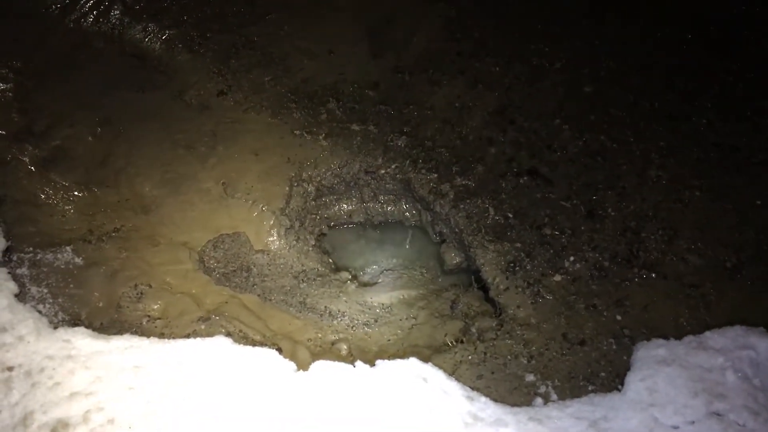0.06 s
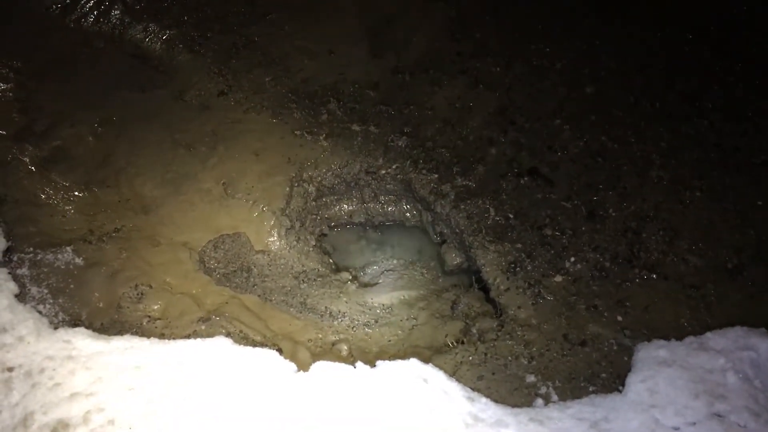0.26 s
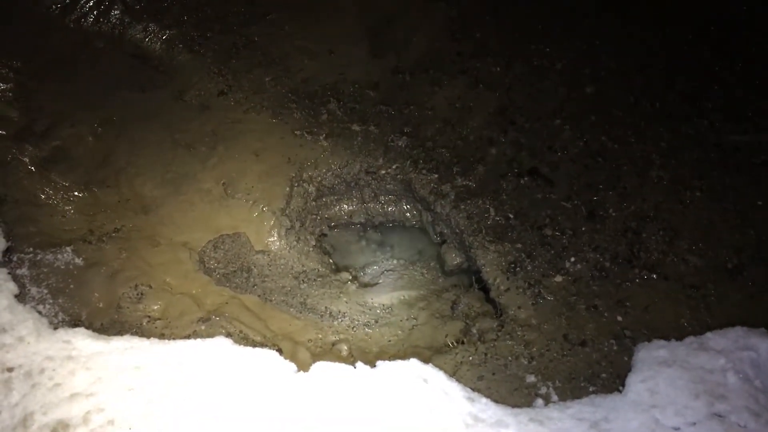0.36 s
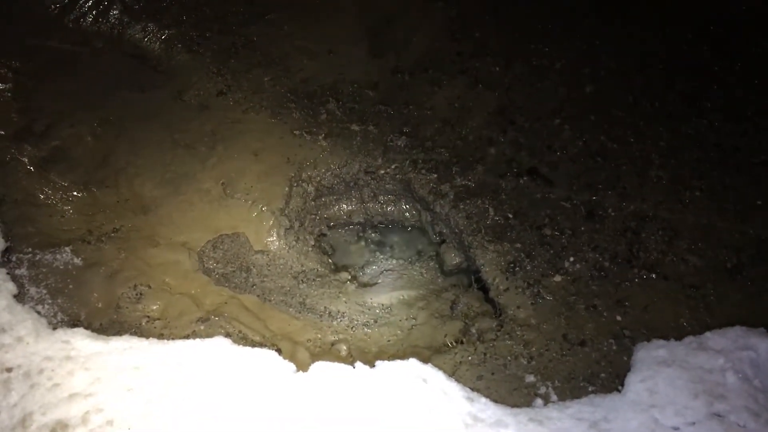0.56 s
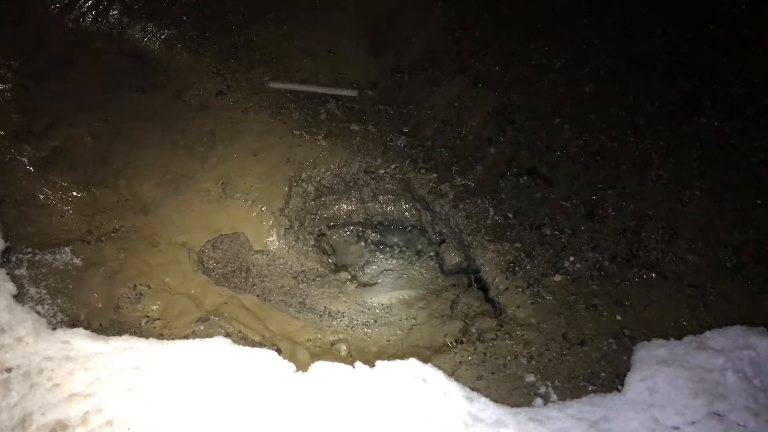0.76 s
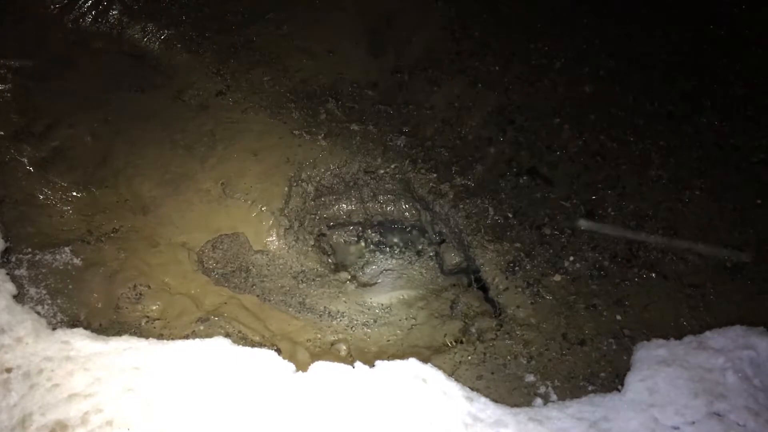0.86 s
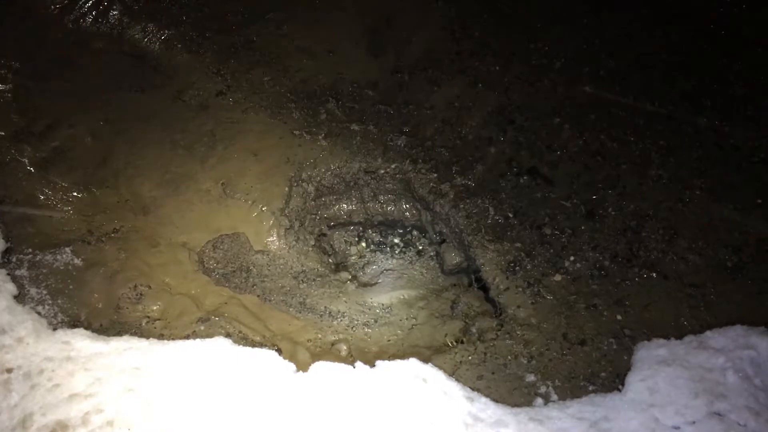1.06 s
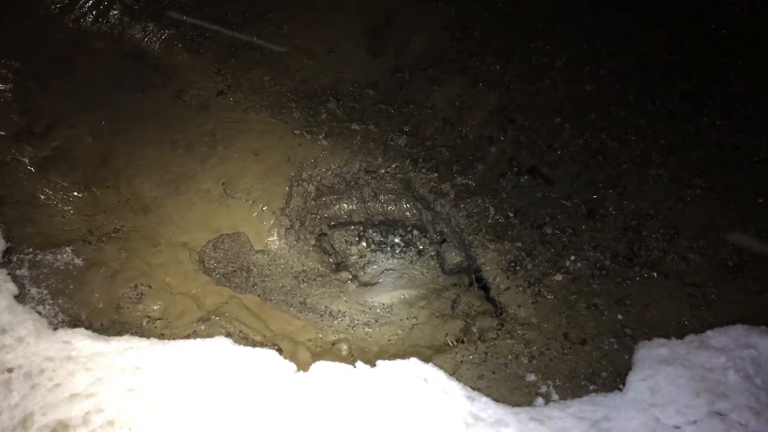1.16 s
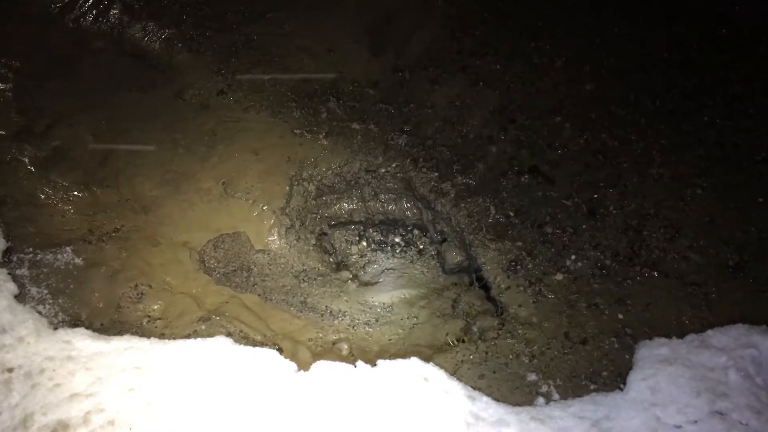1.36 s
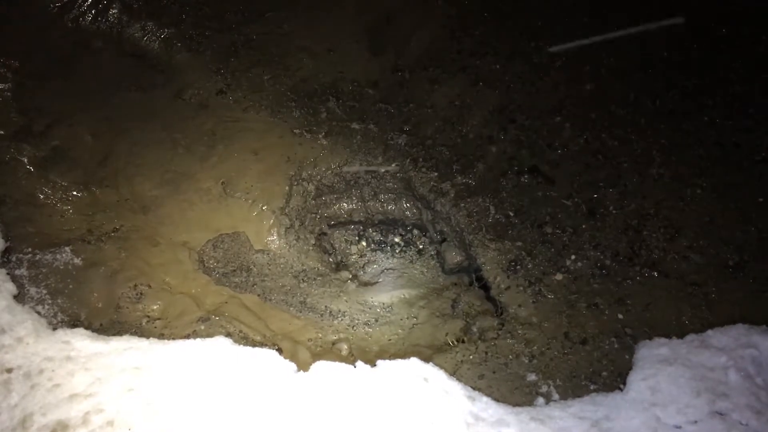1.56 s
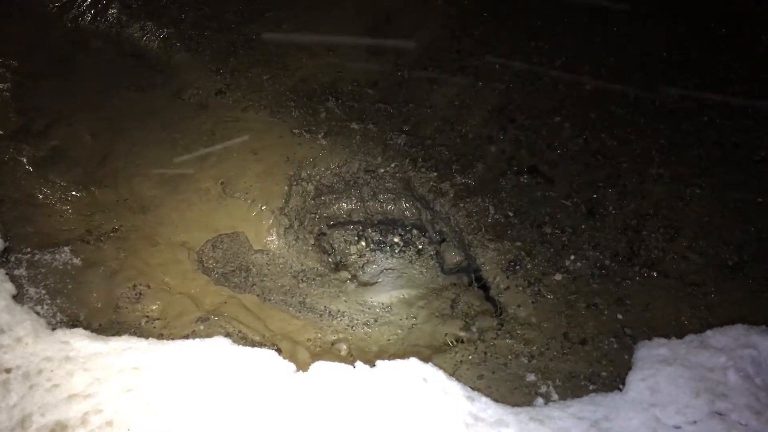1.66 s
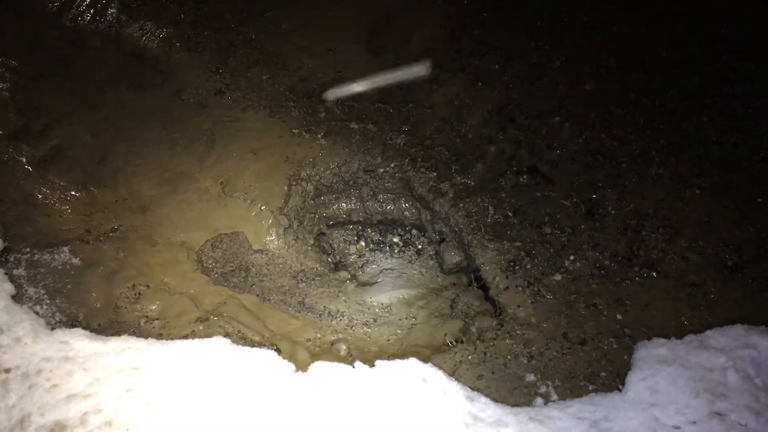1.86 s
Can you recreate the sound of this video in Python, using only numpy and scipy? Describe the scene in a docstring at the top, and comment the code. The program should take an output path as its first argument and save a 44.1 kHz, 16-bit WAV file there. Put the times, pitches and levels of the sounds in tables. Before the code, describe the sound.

Low gurgling comes in quick puffs as water pushes up through mud outdoors, while gusts buffet the nearby microphone. It settles, leaving tiny wet ticks and a faint fizz, before one weaker gurgle and rumble.

```python
"""Gusts buffet a small microphone at night, beside a muddy hollow where water wells up.
Their turbulent pressure is heard as a low rumble that breaks into brief, gurgling puffs.
Tiny bubbles ring as they burst, wet films of mud snap, and the seeping water fizzes.
A faint, steady outdoor rush lies under it all."""
import sys
import numpy as np
from scipy import signal
from scipy.fft import rfft, irfft
from scipy.io import wavfile
from scipy.ndimage import uniform_filter1d

SR = 44100
rng = np.random.default_rng(int(sys.argv[2]) if len(sys.argv) > 2 else 0)


def persist_wave(psi):
    """Save psi, clipped to +-1, as 16-bit WAV."""
    counts = np.round(np.clip(psi, -1, 1) * 32767).astype(np.int16)
    wavfile.write(sys.argv[1], SR, np.atleast_2d(counts).T)


N = 83790
SNAP_ATTACK_S = 0.00024  # onset of a mud tick or a pop of the fizz


def wind():
    """Turbulent pressure: large eddies buffet the microphone, louder in a gust."""
    # Each row: time in seconds, level in dB.
    gusts = [(0.0, -43), (0.074, -54), (0.152, -57.5), (0.178, -39), (0.216, -40), (0.238, -46.5),
             (0.284, -43), (0.3, -52), (0.332, -33.5), (0.386, -37), (0.406, -30), (0.448, -26),
             (0.48, -36), (0.608, -26), (0.64, -47.5), (0.676, -31.5), (0.756, -36), (0.772, -30),
             (0.83, -30), (0.872, -50), (0.888, -52.5), (0.914, -35), (0.926, -37.5), (0.952, -51.5),
             (1.052, -57.5), (1.068, -52), (1.232, -59.5), (1.264, -69), (1.312, -48), (1.354, -56),
             (1.38, -41.5), (1.406, -47.5), (1.428, -33), (1.524, -32.5), (1.54, -44.5), (1.624, -48),
             (1.656, -60), (1.688, -47), (1.72, -53), (1.746, -64), (1.852, -58), (1.878, -45),
             (1.9, -50.5)]
    # Each row: frequency in Hz, relative spectral density in dB.
    buffet_spectrum = [(18, -48.5), (31, -19), (47, 3), (80, 3), (115, -4.5), (170, -13.5), (270, -24),
                       (400, -43), (800, -88), (3000, -140)]
    return eddies(buffet_spectrum, N) * undb(curve(gusts))


def puffs():
    """Wave packets: a few unsteady pressure swings swell and die amid finer turbulence, and gurgle."""
    # Each row: centre time in seconds, level in dB, Gaussian half width in seconds, pitch in Hz.
    packets = [(0.19, -53, 0.0098, 131), (0.346, -32.5, 0.0073, 190.6), (.363, -27.5, 0.0047, 185),
               (.421, -32, 0.014, 145), (.455, -26, 0.0073, 180.9), (0.478, -35.5, 0.017, 215.2),
               (.499, -23.5, 0.0076, 170), (0.528, -36.5, 0.0066, 130), (0.548, -28, 0.0055, 140),
               (0.564, -27.5, 0.0059, 165.2), (0.594, -35, 0.0076, 185), (.611, -28.5, 0.0056, 150),
               (0.636, -40.5, 0.0039, 160.6), (.713, -30.5, 0.0085, 170.8), (.778, -30.5, 0.0072, 158.4),
               (.812, -26.5, 0.0034, 189.5), (.829, -37, 0.015, 165), (0.847, -47.5, 0.0079, 170),
               (0.867, -44, 0.0023, 210), (.920, -43.5, 0.0051, 157.6), (.976, -49, 0.0082, 142.5),
               (1.11, -49.5, 0.0065, 174.8), (1.380, -56.5, 0.028, 137), (1.474, -40, 0.0099, 162.2),
               (1.498, -35.5, 0.0026, 135), (1.566, -47, 0.0093, 134.2), (1.686, -52, 0.012, 218.9)]
    # Coarse and fine turbulence. Each row: multiple of the pitch, relative spectral density in dB.
    churn_spectrum = [(.7, -26.5), (1.2, -3.5), (1.5, -0.5), (2.1, -4.5), (2.7, -12.5), (3.3, -22.5),
                      (5, -66), (12, -130)]
    splutter_spectrum = [(1.8, -34), (2.8, 2.5), (3.7, -1.5), (4.6, -13), (6, -25), (10, -64), (20, -130)]
    churn_db, splutter_db = -9, -26  # relative to the main swing
    wobble_share, wobble_s = 0.2135, 0.005
    out, t = np.zeros(N), np.arange(-4096, 4096) / SR
    for centre, db, half_s, hz in packets:
        swell = np.exp(-0.5 * (t / half_s) ** 2)
        wobble = unit(uniform_filter1d(rng.standard_normal(len(t)), int(wobble_s * SR)))
        pitch = hz * np.exp(wobble_share * wobble)
        swing = np.sin(2 * np.pi * (rng.random() + np.cumsum(pitch) / SR))
        puff = unit(swing * swell)
        for spectrum, band_db in (churn_spectrum, churn_db), (splutter_spectrum, splutter_db):
            turbulence = eddies([(hz * multiple, gain) for multiple, gain in spectrum], len(t))
            puff += undb(band_db) * unit(turbulence * swell)
        add(out, centre + t[0], puff * np.sqrt(np.mean(swell ** 2)) * undb(db))
    return out


def bubbles():
    """Damped resonance: each bursting bubble rings briefly and rises a little in pitch."""
    # Each row: start in seconds, pitch in Hz, level in dB, 60 dB decay time in seconds.
    bursts = [(0.0888, 2390, -51.5, 0.026), (0.1076, 3960, -52, .008), (0.1227, 3240, -52, 0.025),
              (0.1248, 3850, -52.5, 0.017), (0.3722, 5340, -55.5, 0.0088), (0.704, 3550, -62, 0.013),
              (1.130, 8200, -65, .008), (1.2156, 5260, -51, .006), (1.4927, 5340, -50.5, 0.0088),
              (1.889, 7200, -60, 0.0095)]
    rise_share, attack_s = 0.04, 0.00046
    out, t = np.zeros(N), np.arange(2048) / SR
    for start, hz, db, t60 in bursts:
        pitch = hz * (1 + rise_share * np.minimum(t / t60, 1))
        tone = np.sin(2 * np.pi * np.cumsum(pitch) / SR)
        add(out, start, undb(db) * ring(t, attack_s, t60) * tone)
    return out


def mud_ticks():
    """Noise transients: wet films snap, each with a band of spray that dies in milliseconds."""
    # Each row: start in seconds, level in dB, band centre in Hz, half width in octaves,
    # 60 dB decay time in seconds.
    snaps = [(.0886, -48.5, 3250, 0.75, 0.0052), (.109, -62, 4900, .3, 0.011),
             (.1157, -57.5, 10000, .3, 0.0033), (0.124, -60, 5960, 0.64, 0.016),
             (.1390, -59, 12500, 0.27, 0.0077), (0.374, -62, 5530, 0.36, 0.0089),
             (0.7132, -55, 8300, 0.3, 0.0048), (0.87, -60, 10100, 0.23, 0.0099),
             (0.98, -61, 6800, .9, 0.0097), (1.042, -68, 7100, .4, 0.0061),
             (1.1188, -61, 3780, 0.33, 0.012), (1.1425, -61, 2530, 0.42, 0.018),
             (1.185, -58, 1850, 0.24, 0.023), (1.1936, -56.5, 2480, 0.95, 0.025),
             (1.2152, -45, 890, 2.45, 0.011), (1.313, -63.5, 12900, 1.1, 0.0089),
             (1.594, -62, 10000, .4, .005), (1.729, -60, 10500, .5, .005)]
    rolloff_hz = 13000
    out, t = np.zeros(N), np.arange(2048) / SR
    f = np.maximum(np.fft.rfftfreq(len(t), 1 / SR), 1)
    treble_loss = np.hypot(1, (f / rolloff_hz) ** 2)
    for start, db, hz, octaves, t60 in snaps:
        band = 1 / (1 + (np.log2(f / hz) / octaves) ** 2)
        spray = irfft(rfft(rng.standard_normal(len(t))) * band / treble_loss)
        decay = ring(t, SNAP_ATTACK_S, t60)
        add(out, start, undb(db) * unit(spray * decay) * np.sqrt(np.mean(decay ** 2)))
    return out


def fizz():
    """Shot noise: seeping water makes countless tiny pops of unequal size, whose powers add."""
    # Each row: time in seconds, level in dB.
    levels = [(0, -71), (.13, -83), (.25, -90), (.8, -94), (1.0, -83), (1.19, -71), (1.28, -77),
              (1.45, -79), (1.9, -81.5)]
    # Each row: frequency in Hz, relative spectral density in dB.
    spectrum = [(700, -30), (1800, 14), (2700, 2.5), (3400, 1), (5000, -2), (9000, -1), (15000, -27.5)]
    pops_per_s, spread_db, t60 = 900, 4.5, 0.011
    popping = rng.random(N) < pops_per_s / SR
    sizes = np.minimum(rng.exponential(size=N), 5)
    pops = popping * undb(spread_db * sizes)
    decay = ring(np.arange(1024) / SR, SNAP_ATTACK_S, t60)
    power = signal.fftconvolve(pops ** 2, decay ** 2)[:N]
    crackle = np.sqrt(np.abs(power)) * rng.standard_normal(N)
    return colour(crackle, spectrum) * undb(curve(levels))


def outdoor_rush():
    """Stationary broadband noise: the smooth, distant background of the night."""
    # Each row: frequency in Hz, relative spectral density in dB.
    spectrum = [(25, -14.5), (55, 3), (130, -4), (260, -5.5), (370, 2.5), (500, -6.5), (950, -3.5),
                (1400, -8.5), (2100, -15), (2800, -23), (3600, -22.5), (4800, -28.5), (9500, -31),
                (10400, -36.5), (11200, -30), (15500, -36)]
    level_db = -64.5
    return colour(rng.standard_normal(N), spectrum) * undb(level_db)


def eddies(spectrum, size):
    """Envelope compression: turbulent noise, divided by part of its own envelope, has an even strength."""
    window_s, evenness = 0.052, 0.78
    pressure = colour(rng.standard_normal(size), spectrum)
    power = uniform_filter1d(np.abs(signal.hilbert(pressure)) ** 2, int(window_s * SR))
    return unit(pressure / power ** (evenness / 2))


def colour(x, spectrum):
    """Spectral shaping: filter by (Hz, dB) points and scale to an rms of 1."""
    hz, db = np.array(spectrum).T
    f = np.maximum(np.fft.rfftfreq(len(x), 1 / SR), 1)
    gain = undb(np.interp(np.log(f), np.log(hz), db))
    return unit(irfft(rfft(x) * gain, len(x)))


def ring(t, attack_s, t60):
    """Exponential damping: a quick rise, then a fall of 60 dB every t60 seconds."""
    return (1 - np.exp(-t / attack_s)) * np.exp(-np.log(1000) * t / t60)


def undb(db):
    """Amplitude ratio of a level in decibels."""
    return 10 ** (np.asarray(db) / 20)


def unit(x):
    """Normalisation to an rms of 1."""
    return x / np.sqrt(np.mean(x ** 2) + 1e-30)


def curve(rows):
    """Linear interpolation between (seconds, value) rows."""
    return np.interp(np.arange(N) / SR, *np.array(rows).T)


def add(out, start, x):
    """Superposition of a short sound from its start in seconds."""
    i = int(np.clip(start * SR, 0, N - 1))
    out[i:i + len(x)] += x[:N - i]


def scene():
    """Superposition: the pressures of wind, seeping water and background add at one microphone."""
    return (wind() + puffs() + bubbles() + mud_ticks() + fizz() + outdoor_rush())[None]


def record(dry):
    """Band limiting: filters thin the deepest bass and cut the highest treble."""
    low_cut_hz, top_cut_hz = 28.3, 15600
    bass_cut = signal.butter(4, low_cut_hz, "high", fs=SR, output="sos")
    top_cut = signal.ellip(8, 0.2, 70, top_cut_hz, fs=SR, output="sos")
    fade_in = np.minimum(np.arange(N) / 48, 1)
    return signal.sosfilt(top_cut, signal.sosfilt(bass_cut, dry * fade_in))


dry = scene()
out = record(dry)
persist_wave(out)
```